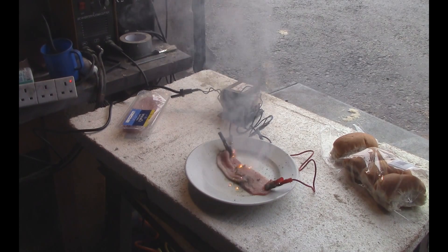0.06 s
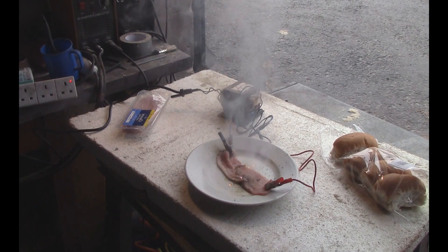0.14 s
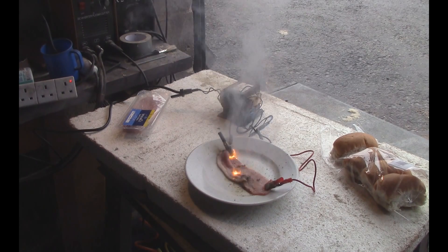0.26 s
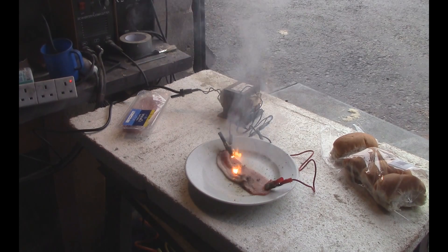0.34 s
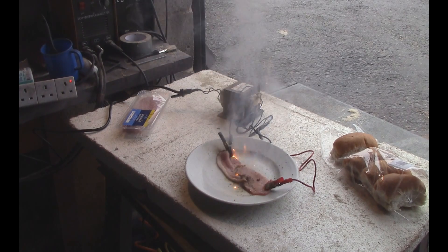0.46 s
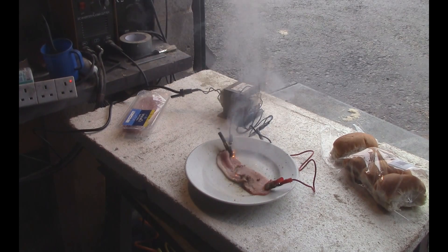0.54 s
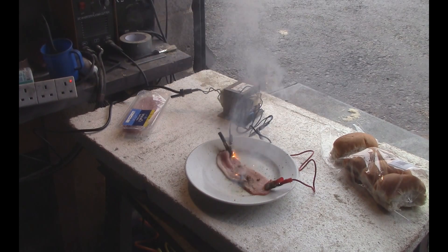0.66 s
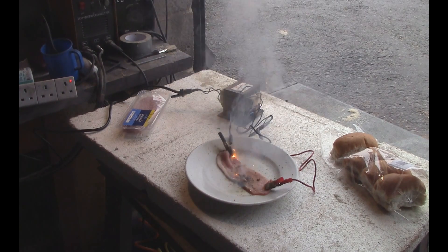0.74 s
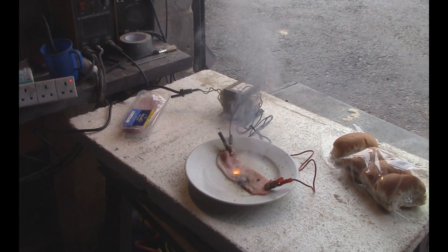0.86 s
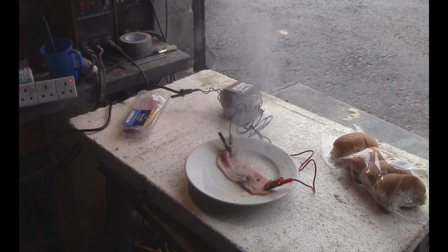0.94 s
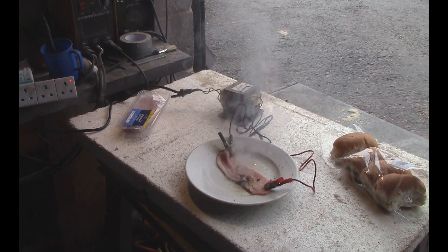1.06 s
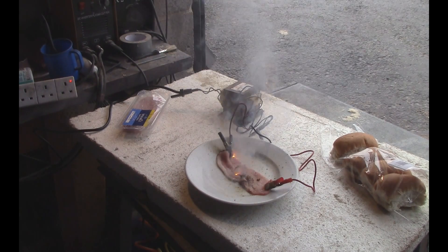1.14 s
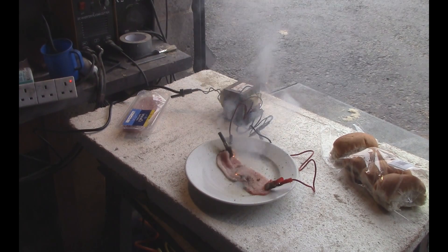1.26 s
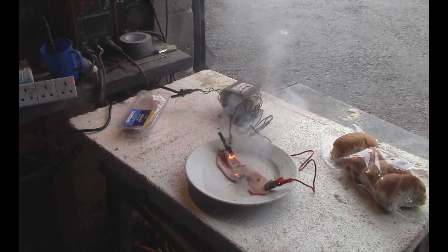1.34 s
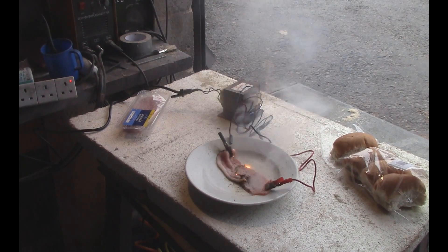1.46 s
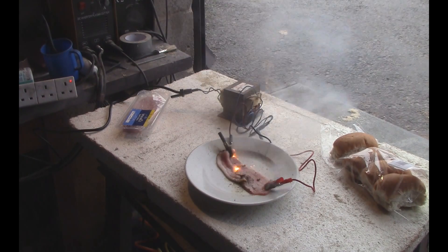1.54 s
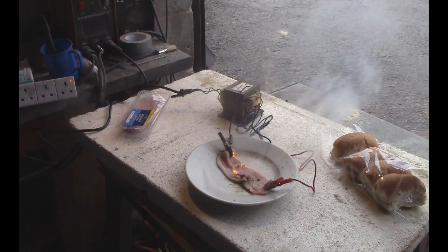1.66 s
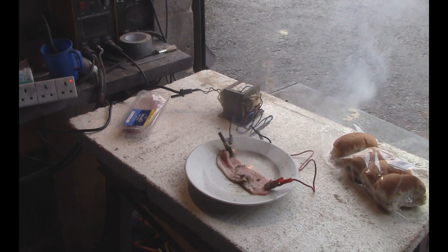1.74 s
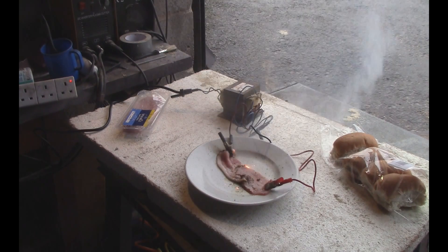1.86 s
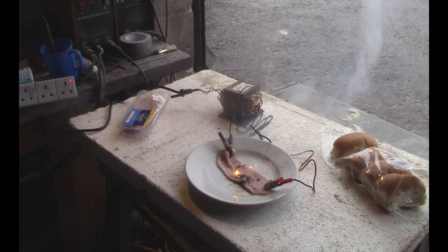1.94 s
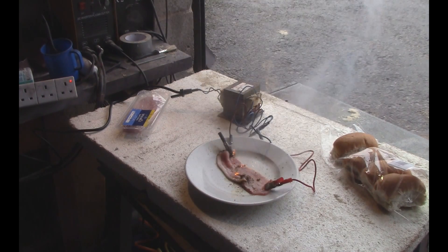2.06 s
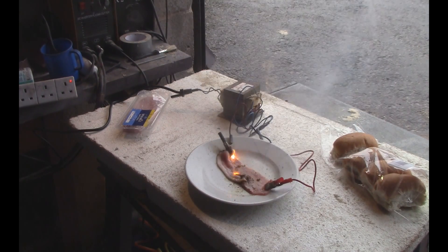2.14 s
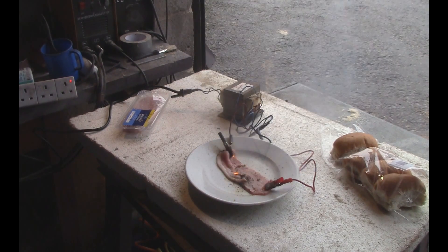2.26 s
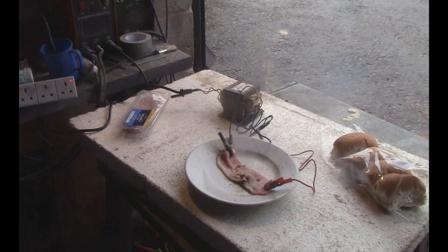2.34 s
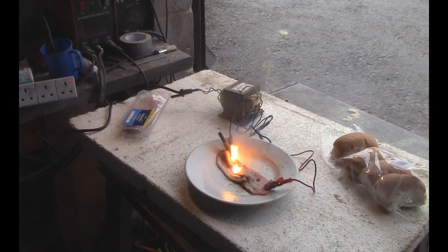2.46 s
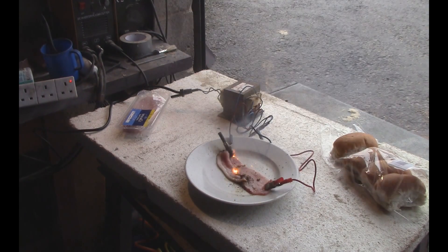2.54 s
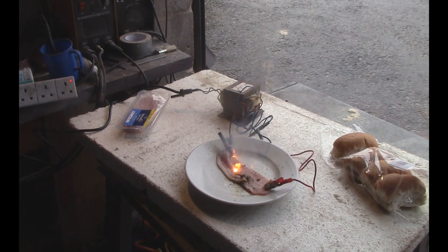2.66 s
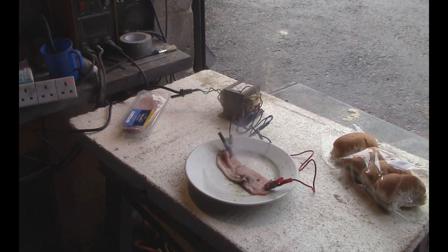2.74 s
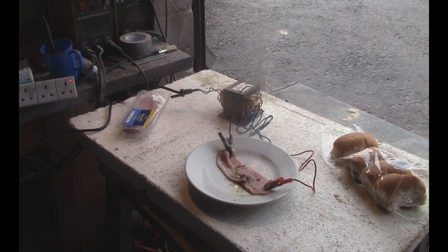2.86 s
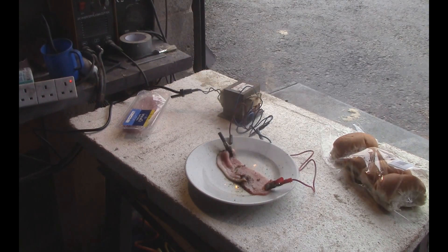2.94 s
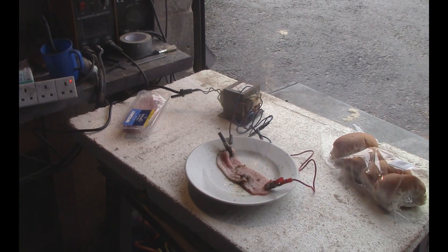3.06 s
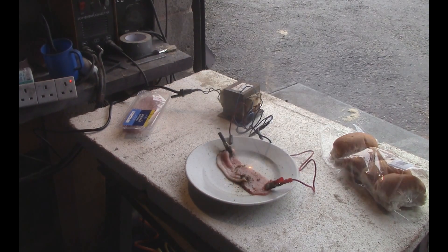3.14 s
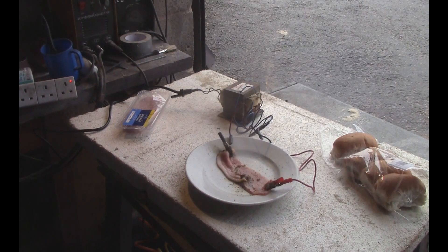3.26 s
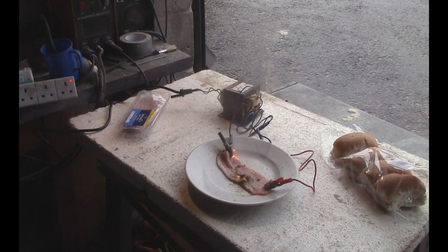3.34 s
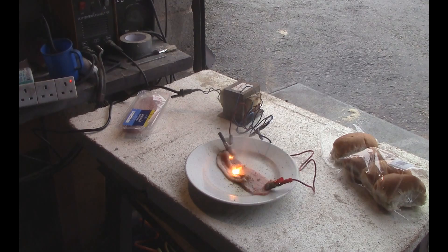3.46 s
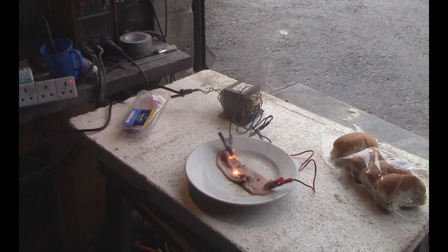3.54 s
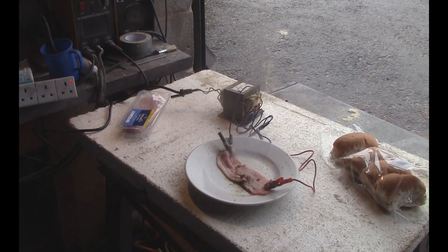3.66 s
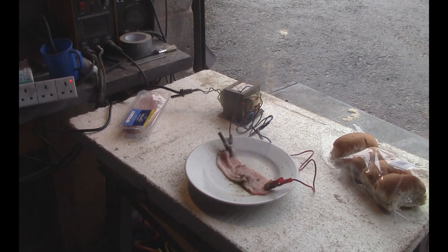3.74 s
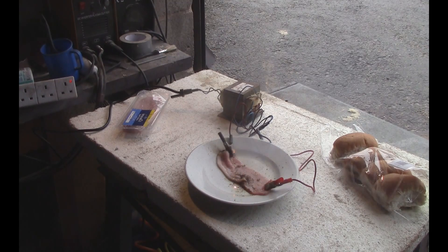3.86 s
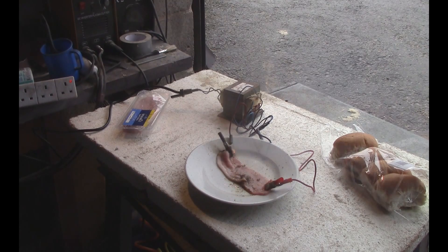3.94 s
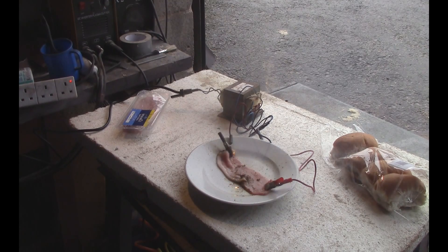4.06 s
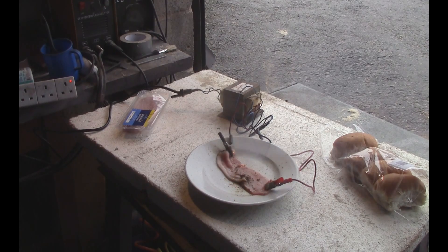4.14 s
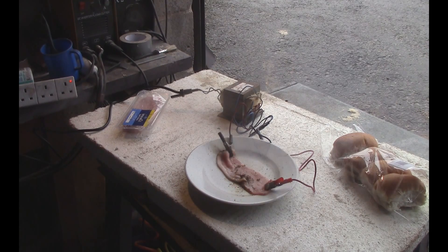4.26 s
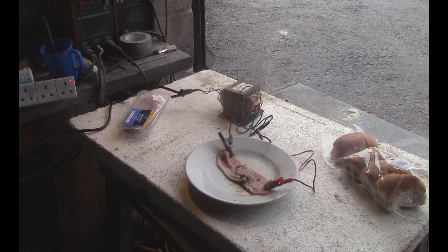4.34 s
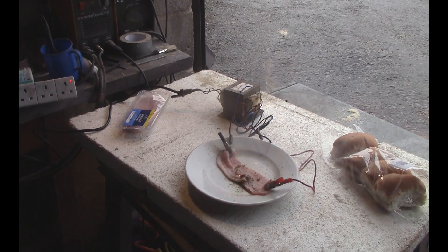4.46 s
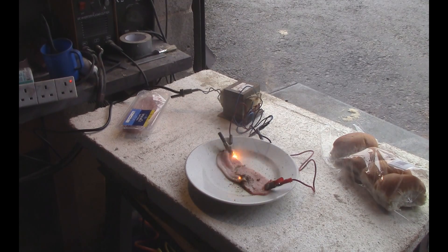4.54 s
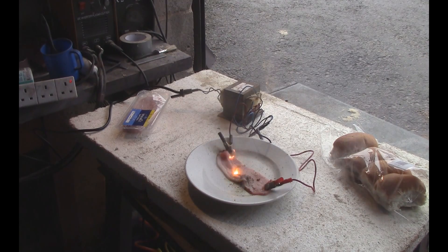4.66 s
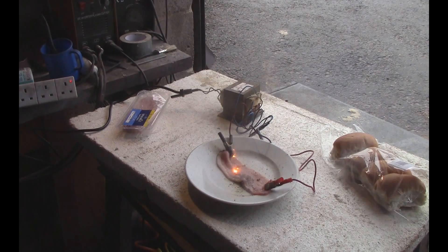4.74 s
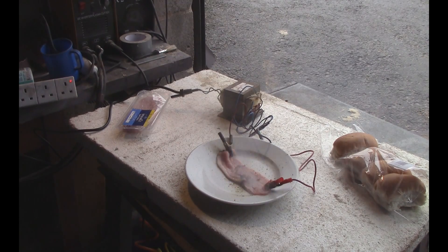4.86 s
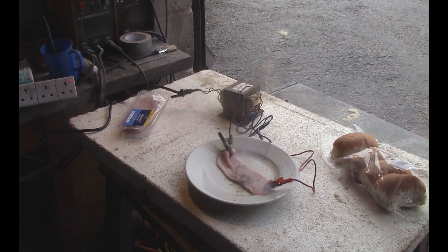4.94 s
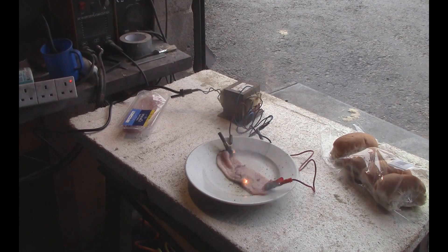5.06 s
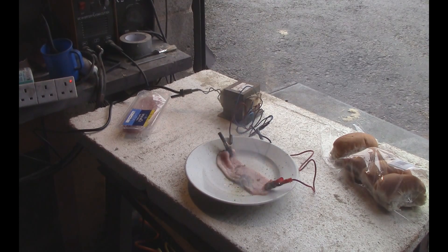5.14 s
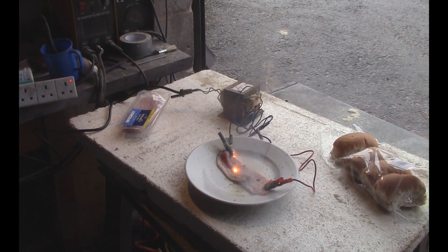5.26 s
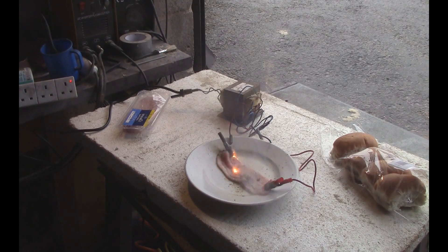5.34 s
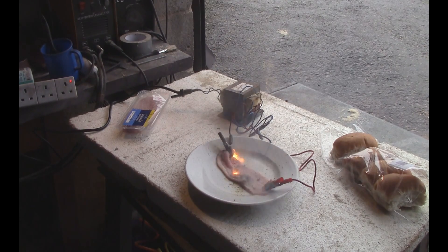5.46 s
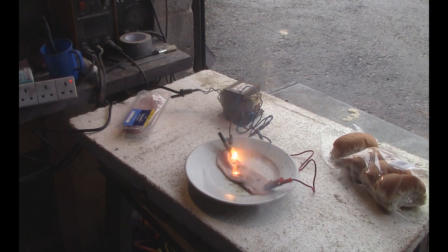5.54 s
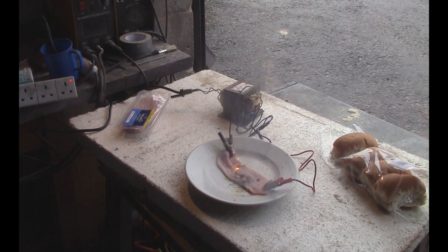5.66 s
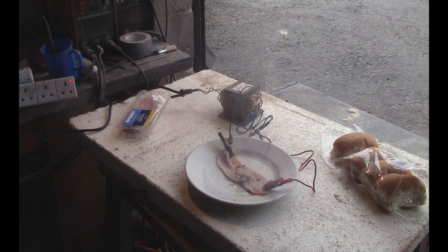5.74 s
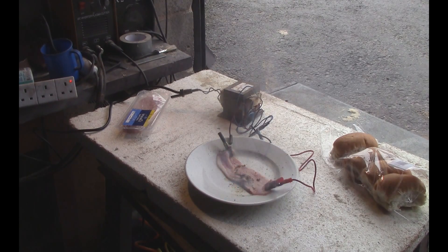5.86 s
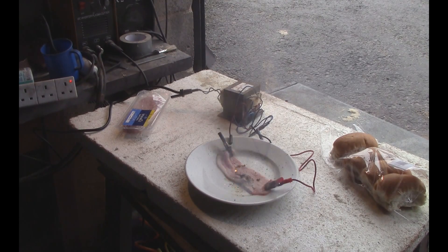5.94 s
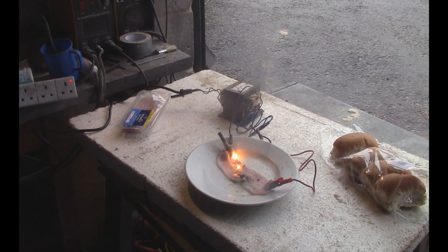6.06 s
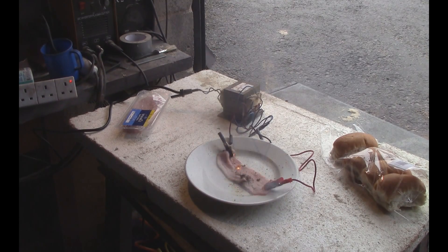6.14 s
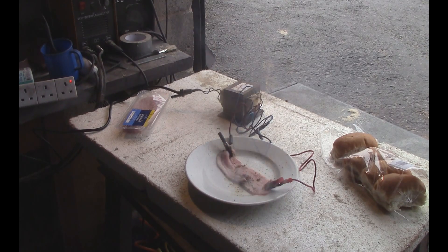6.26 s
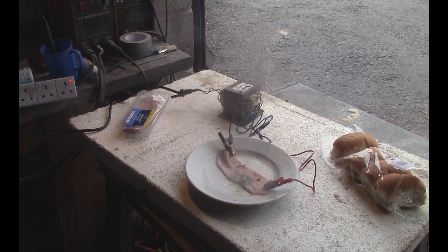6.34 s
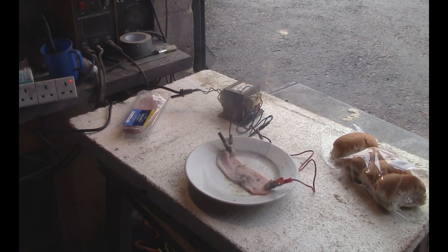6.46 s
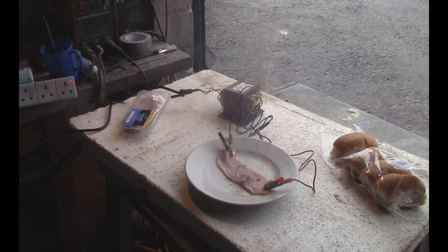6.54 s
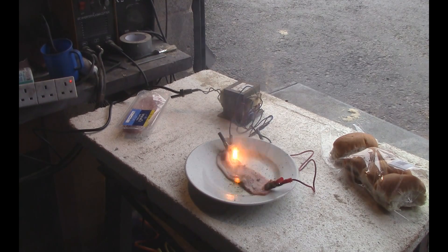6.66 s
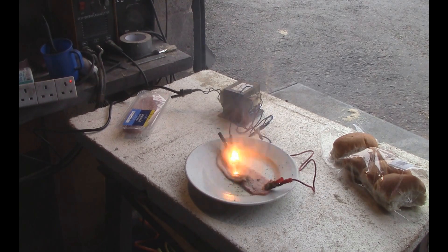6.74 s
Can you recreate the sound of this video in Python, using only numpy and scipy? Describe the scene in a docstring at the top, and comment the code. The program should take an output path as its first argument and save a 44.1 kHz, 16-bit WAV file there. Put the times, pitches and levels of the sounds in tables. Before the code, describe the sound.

Irregular sharp electric snaps and short raspy buzzing arcs spit over a faint fizzing sizzle, with transformer hum and soft outdoor air in a workshop.

```python
"""Sharp snaps and short buzzing arcs over a faint fizz: high voltage arcs through bacon on a plate on a bench.
Sparks strike at the mains crests, about 100 a second; each sprays tiny discharges and puffs hot gas.
Filters with the resonances of plate and bench ring to them; the later puffs gain a midrange bark.
Random bubble pops make the fat sizzle, a noise burst is a spit of steam, sines are the transformer's whine,
and shaped noise is outdoor air murmuring through the open door."""
import sys
import numpy as np
from scipy import signal
from scipy.io import wavfile

SR = 44100
rng = np.random.default_rng(int(sys.argv[2]) if len(sys.argv) > 2 else 0)


def dump(signal):
    """Clip the signal to [-1, 1] and save it as 16-bit WAV at the path in sys.argv[1]."""
    limited = np.clip(np.atleast_2d(signal).T, -1, 1)
    pcm = np.round(limited * 32767).astype(np.int16)
    wavfile.write(sys.argv[1], SR, pcm)


N = 299880
TIME_S = np.arange(N) / SR
MAINS_HZ, FIRST_CREST_S = 49.9707, .00773


def amp(db):
    """Decibels to gain."""
    return 10 ** (np.asarray(db) / 20)


def unit(x):
    """Scales to rms 1."""
    return x / np.sqrt(np.mean(x ** 2) + 1e-20)


def unit_energy(x):
    """Scales to a sum of squares of 1."""
    return unit(x) / np.sqrt(len(x))


def bell(t, width):
    """Gaussian hump of height 1 around t = 0."""
    return np.exp(-(t / width) ** 2 / 2)


def heavy_tail_db(scale_db, size):
    """Random level lift, exponentially distributed and capped at 4 scales."""
    return scale_db * np.minimum(rng.exponential(1, size), 4)


def read(points, hz):
    """Joins (frequency [Hz], value) points on a log-frequency axis."""
    point_hz, value = np.transpose(points)
    return np.interp(np.log(hz + 1), np.log(point_hz), value)


def add(mix, start_s, sound):
    """Mixes a sound in at a time, trimmed to the mix."""
    at = int(round(start_s * SR))
    part = mix[max(at, 0):max(at + len(sound), 0)]
    part += sound[max(-at, 0):][:len(part)]


# resonances of plate, bench and the corner behind: (frequency [Hz], width [Hz], full lift [dB])
BENCH_MODES = [(195, 93, 8.5), (240.7, 86, 15.5), (376, 23, 14), (439, 61.4, 13.0), (556, 20, 7.5),
               (652, 111, 12.5), (813, 114, 11), (1033, 134, 11.0), (1257, 140, 9), (1412, 177, 8),
               (1517, 8.6, 9.5), (1660, 98, 10.5), (1924, 145, 8.5), (2120, 67, 6), (2293, 65, 6),
               (2473, 73, 5.5)]


def colour(x, spectrum, ring, size=8192):
    """Minimum-phase filter: a smooth spectrum in dB lifted by a share (ring) of the bench resonances."""
    hz = abs(np.fft.fftfreq(size, 1 / SR))
    lift_db = sum(lift / (1 + (2 * (hz - mode_hz) / width_hz) ** 2) for mode_hz, width_hz, lift in BENCH_MODES)
    log_gain = np.log(amp(read(spectrum, hz) + ring * lift_db))
    response = np.fft.ifft(np.exp(np.conj(signal.hilbert(log_gain)))).real
    return signal.oaconvolve(x, response[:size // 2])[:N]


# spectrum of the background air: (frequency [Hz], relative density [dB/Hz])
AIR_SPECTRUM = [(15, -69), (25, -52), (84, -10.5), (149, -2), (200, -9.5), (301, 0), (936, -9), (1100, -10),
                (1330, -13.5), (2690, -13.5), (4870, -22.5), (8590, -33), (12500, -25), (14000, -24),
                (16000, -36)]


def air(level_db=-41.5, side_db=-19):
    """Steady murmur from yard and shop: shaped noise, mid plus a weaker independent side."""
    mid, side = (unit(colour(rng.standard_normal(N), AIR_SPECTRUM, ring=0.28)) for _ in range(2))
    return amp(level_db) * (mid + amp(side_db) * np.array([side, -side]))


# transformer lines: (multiple of the mains frequency [1], rms level before waver [dB])
HUM_LINES = [(4, -52), (6, -53.5), (8, -83), (16, -58.5), (22, -44.5), (24, -52.5)]


def transformer(waver_db=2.0, knot_count=40):
    """The iron core hums on even multiples of the mains, each line wavering in level."""
    knots_s = np.linspace(0, N / SR, knot_count)
    hum = np.zeros(N)
    for multiple, level_db in HUM_LINES:
        drift_db = waver_db * np.interp(TIME_S, knots_s, rng.standard_normal(knot_count))
        cycles = multiple * MAINS_HZ * TIME_S + rng.random()
        hum += amp(level_db + drift_db) * np.sqrt(2) * np.sin(2 * np.pi * cycles)
    return hum


# colour of the sizzling fat: (frequency [Hz], relative level [dB])
FAT_SPECTRUM = [(200, -20), (2500, -3.5), (4500, -6), (7000, -10), (10000, -5), (12600, -13), (16000, -39)]
# small sparks creeping along the charred track: (time [s], crack level before trim [dB])
FIZZ_LEVEL = [(0.0, -38.5), (0.65, -36.5), (0.95, -45), (1.2, -38.5), (1.85, -38), (2.2, -40), (2.45, -36),
              (2.7, -39.5), (3.65, -44.5), (4.25, -40.5), (4.7, -35), (5.1, -42), (5.55, -30), (5.7, -40.5),
              (6.3, -40.5), (6.79, -33)]


def sizzle(pops_per_s=700, size_db=1.0, mean_level_db=-56.5, follow_db_per_db=0.26):
    """Tiny bubbles burst at random in the fat, louder while the fizz heats it."""
    popping = rng.random(N) < pops_per_s / SR
    pops = popping * rng.standard_normal(N) * amp(heavy_tail_db(size_db, N))
    heat_db = np.interp(TIME_S, *np.transpose(FIZZ_LEVEL))
    level_db = mean_level_db + follow_db_per_db * (heat_db - heat_db.mean())
    return amp(level_db) * unit(colour(pops, FAT_SPECTRUM, ring=0.43))


def steam(at_s=2.955, width_s=0.02, peak_db=-37):
    """A pocket of steam escapes with a short soft spit: grainy noise under a bell."""
    spit = rng.standard_normal(N) * rng.exponential(1, N)
    return amp(peak_db) * unit(colour(spit, FAT_SPECTRUM, ring=0.69)) * bell(TIME_S - at_s, width_s)


def crest_at(s):
    """Number of the mains crest nearest to a time."""
    return int(round((s - FIRST_CREST_S) * 2 * MAINS_HZ))


# Spark levels below are relative, before the source gains in sparks().
# arcs restriking at the crests: (first strike [s], last strike [s], opening crack [dB], closing crack [dB],
# gas puff over crack [dB], forward over reverse half cycles [dB])
ARCS_AT = [(0.22, 0.29, -13, -17, -9, 1), (0.303, 0.44, -18.5, -26, -8.5, 1.5),
           (0.59, 0.65, -21.5, -32, -8.5, 7), (0.69, 0.80, -22.5, -18, -5, 9.5),
           (0.83, 0.87, -16, -20, -10, 1), (1.07, 1.13, -23, -31, -1.5, 0.5),
           (1.57, 1.59, -22.5, -19, -5.5, 17), (1.91, 1.95, -20, -23.5, 0.5, 11),
           (2.03, 2.15, -16.5, -16.5, -6.5, -1.5), (2.31, 2.39, -23, -23, -2, 21),
           (2.43, 2.51, -27.5, -29.5, -0.5, 19), (3.24, 3.32, -15.5, -27.5, -6, 4),
           (3.33, 3.41, -12.5, -20.5, -8.5, 3.5), (3.42, 3.53, -21.5, -18, -4, -0.5),
           (4.34, 4.40, -29.5, -26, -6.5, -11), (4.49, 4.61, -15, -18, -5, 8),
           (4.69, 4.75, -22, -14.5, -2.5, 12), (4.91, 4.99, -18, -17.5, -5.5, 2),
           (5.19, 5.25, -28.5, -14, -0.5, 12), (5.29, 5.43, -24, -17.5, -1, 15),
           (5.47, 5.51, -20, -22.5, 1.5, 17), (6.59, 6.64, -16, -18.5, -6, 1),
           (6.68, 6.76, -23, -25.5, -15.5, 3)]
# single snaps across the charred track, alone or amid an arc: (time [s], crack [dB], gas puff [dB])
SNAPS_AT = [(0.01, -30.5, -30.5), (0.13, -25, -31.5), (0.20, -17, -27), (0.37, -12.5, -23),
            (0.51, -18.5, -32.5), (0.71, -15, -30), (1.00, -26.5, -31.5), (1.12, -14.5, -29),
            (1.17, -24, -30.5), (1.23, -21, -27), (1.29, -19.5, -29), (1.31, -15, -31),
            (1.37, -17.5, -27.5), (1.49, -25.5, -24.5), (1.54, -24.5, -37), (1.77, -15, -20.5),
            (1.93, -11.5, -19), (1.99, -22, -22.5), (2.25, -25, -26.5), (2.61, -25, -23),
            (3.41, -10.5, -15.5), (3.85, -27.5, -29), (3.99, -23.5, -31), (4.04, -24.5, -33),
            (4.80, -26.5, -27), (4.95, -11, -20), (5.05, -23.5, -29), (5.57, -25.5, -24.5),
            (5.63, -19.5, -20.5), (5.77, -17.5, -17.5), (6.34, -26.5, -36), (6.39, -31.5, -30.5),
            (6.46, -13, -15), (6.50, -22.5, -36), (6.55, -26, -25), (6.62, -14.5, -17.5),
            (6.72, -12.5, -14.5)]
# a leading spark lights the fat, the next crest sets it off: (flash time [s], crack [dB], gas puff [dB])
FLASHES_AT = [(2.42, -16, -15), (3.38, -12.5, -16.5), (4.44, -11.5, -13.5), (4.57, -12, -10),
              (4.64, -14, -13), (5.26, -13.5, -13), (5.34, -15.5, -9.5), (5.50, -14, -19.5),
              (5.94, -14, -12.5), (6.02, -15.5, -17), (6.44, -12.5, -13.5), (6.58, -16.5, -10.5),
              (6.70, -12, -17.5)]
LEADER_CRACK_DB, LEADER_PUFF_DB = -1.6, -8  # relative to the flash


def strikes(fizz_spread_db=5.0, arc_spread_db=2.5, polarity_db=3.5, fizz_trim_db=-5.0, fizz_puff_db=-13,
            gas_spread_db=1.0, jitter_s=.00035):
    """One spark per crest, rows (s, crack dB, puff dB): fizz unless an arc, snap or flash takes the crest."""
    crest = np.arange(int(N / SR * 2 * MAINS_HZ))
    luck, gas, late = rng.standard_normal((len(crest), 3)).T
    luck = 2 * np.tanh(luck / 2)
    way = 1 - 2 * (crest % 2)  # +1 forward, -1 reverse: the gap breaks down more easily one way round
    s = FIRST_CREST_S + crest / (2 * MAINS_HZ) + jitter_s * late

    crack = np.interp(s, *np.transpose(FIZZ_LEVEL)) + fizz_trim_db
    crack += fizz_spread_db * luck - polarity_db * way
    puff = crack + fizz_puff_db + gas_spread_db * gas

    for first_s, last_s, opening_db, closing_db, gas_db, lopsided_db in ARCS_AT:
        k = np.arange(crest_at(first_s), crest_at(last_s) + 1)
        weak_way_db = np.minimum(lopsided_db * way[k], 0)
        crack[k] = np.linspace(opening_db, closing_db, len(k)) + weak_way_db + arc_spread_db * luck[k]
        puff[k] = crack[k] + gas_db + gas_spread_db * gas[k]
    for at_s, crack_db, puff_db in SNAPS_AT:
        k = crest_at(at_s)
        crack[k], puff[k] = crack_db, puff_db
    for at_s, crack_db, puff_db in FLASHES_AT:
        k = crest_at(at_s)
        crack[k - 1], puff[k - 1] = crack_db + LEADER_CRACK_DB, puff_db + LEADER_PUFF_DB
        crack[k], puff[k] = crack_db, puff_db
    return np.column_stack([s, crack, puff])


def flame(flares, low_hz=1280, high_hz=2350, level_db=24, dry_s=5.13, over_s=1.0):
    """As the meat dries, the puffs ignite the fat and gain a hard bark in the midrange."""
    dryness = 1 / (1 + np.exp((dry_s - TIME_S) / over_s))
    band = signal.butter(2, [low_hz, high_hz], "bandpass", fs=SR, output="sos")
    return amp(level_db) * signal.sosfilt(band, flares * dryness)


# colour of a discharge: (frequency [Hz], relative level [dB])
CRACK_SPECTRUM = [(30, -47), (100, -12.5), (200, -20), (600, -11.5), (1500, -9.5), (2700, 3.5), (4700, 1),
                  (6500, 6), (8500, 3), (11000, -1.5), (12600, -8), (14000, -6.5), (16000, -12.5)]
# colour of its gas puff: (frequency [Hz], relative level [dB])
PUFF_SPECTRUM = [(25, -29), (90, -16), (165, -0.5), (260, -6.5), (400, -2.5), (650, -2), (1000, 2),
                 (1600, 5.5), (2500, 7.5), (5000, -10), (12000, -55)]
BURN_S, GROWTH_PER_DB = .0018, .008  # burn scale at a -20 dB crack, and its exponential growth


def sparks(grain_db=3.5, swell_s=0.00063, collapse_s=0.00017, lag_s=0.001507, turbulence=1.0, spatter=0.15,
           crack_db=26, puff_db=16.5, size=768):
    """Sparks spray tiny discharges; the heated gas swells, then collapses as the current stops."""
    cracks, puffs, flares = np.zeros((3, N))
    t = (np.arange(size) - size // 2) / SR
    for s, crack, puff in strikes():
        hiss, eddies, fire = rng.standard_normal((3, size))
        burn_s = BURN_S * np.exp(GROWTH_PER_DB * (crack + 20))  # strong sparks burn longer
        burn = bell(t ** 2 / burn_s, burn_s) * bell(t, burn_s)
        burn += spatter * bell(t - burn_s, burn_s)  # fat spatters just after the crest
        spray = hiss * amp(heavy_tail_db(grain_db, size)) * burn

        swell = bell(t - lag_s + swell_s, swell_s) / swell_s
        collapse = np.exp(-abs(t - lag_s) / collapse_s) / collapse_s
        hot = bell(t - lag_s / 2, burn_s / 2)
        push = unit(swell - collapse) + turbulence * unit(eddies * hot)

        add(cracks, s + t[0], amp(crack) * unit_energy(spray))
        add(puffs, s + t[0], amp(puff) * unit_energy(push))
        add(flares, s + t[0], amp(puff) * unit_energy(fire * hot))
    discharge = amp(crack_db) * colour(cracks, CRACK_SPECTRUM, ring=.85)
    gas = colour(amp(puff_db) * puffs + flame(flares), PUFF_SPECTRUM, ring=0.92)
    return discharge + gas


# workshop reverberation: (frequency [Hz], t60 [s])
ROOM_DECAY = [(150, 0.13), (400, 0.17), (1000, 0.12), (3000, 0.12), (7000, 0.095), (15000, 0.086)]
# side of the echo tail, how much the two microphone ports differ: (frequency [Hz], side gain [dB])
TAIL_WIDTH = [(200, -9), (1200, -56), (5000, -15.5)]


def workshop(x, wet_db=-6.0, build_s=0.0014, wander_hz=3.1, spot_count=5):
    """Reflections from bench and shelves blur into a short decaying tail with a weaker side part."""
    shape = (spot_count, 2, SR // 2)  # spot, mid/side, sample
    taps = rng.standard_normal(shape) * (rng.random(shape) < .3)
    hz, t, z = signal.stft(taps, SR, nperseg=128)
    z *= amp(-60 * t / read(ROOM_DECAY, hz)[:, None])
    z[:, 1] *= amp(read(TAIL_WIDTH, hz))[:, None]
    tails = signal.istft(z, SR, nperseg=128)[1]
    tails *= 1 - np.exp(-(TIME_S[:tails.shape[-1]] / build_s) ** 2)
    tails *= amp(wet_db) / np.linalg.norm(tails[:, :1], axis=2, keepdims=True)
    # the arc wanders over the meat in a cycle of spots, each answered by its own pattern of echoes
    cycles = wander_hz * TIME_S + np.arange(spot_count)[:, None] / spot_count
    spots = np.maximum(np.cos(2 * np.pi * cycles), 0) ** 2
    spots /= np.linalg.norm(spots, axis=0)
    mid, side = signal.fftconvolve((x * spots)[:, None], tails, axes=2)[..., :N].sum(0)
    return x + mid + np.array([side, -side])


def scene():
    """Sparks, sizzle and steam with room echoes; transformer and air added without; right slightly louder."""
    bench = workshop(sparks() + sizzle() + steam())
    return (bench + transformer() + air()) * amp([[-.2], [.2]])


def record(dry, ceiling=1.25, edge_hz=16050):
    """The loudest snaps overload the microphone softly (tanh); then a low-pass sets the band limit."""
    low_pass = signal.firwin(401, edge_hz, window=("kaiser", 8), fs=SR)
    return signal.oaconvolve(ceiling * np.tanh(dry / ceiling), low_pass[None], "same")


dry = scene()
out = record(dry)
dump(out)
```